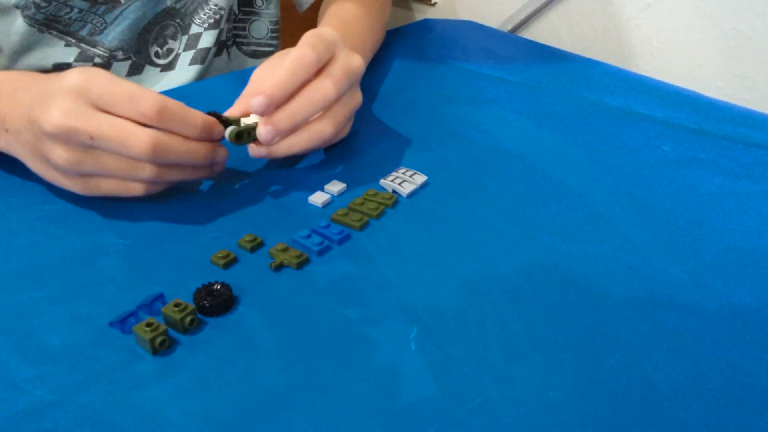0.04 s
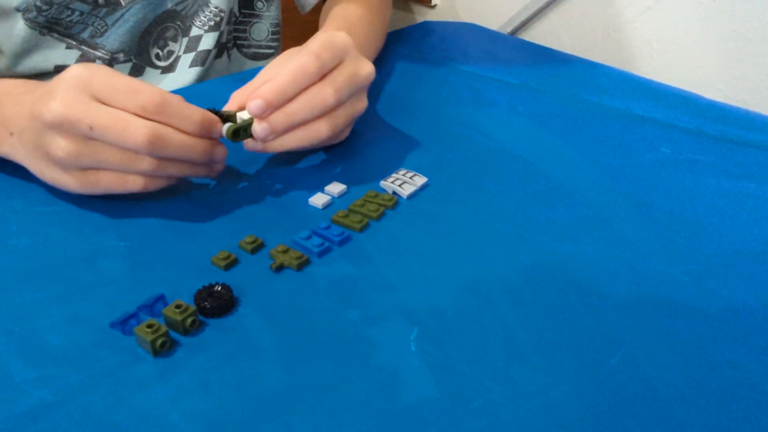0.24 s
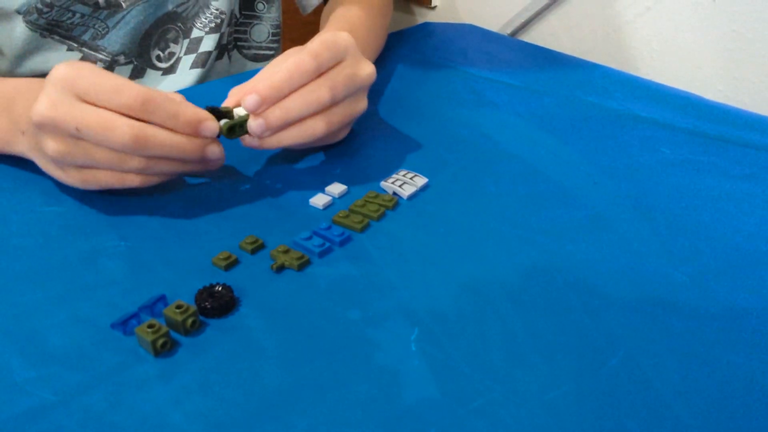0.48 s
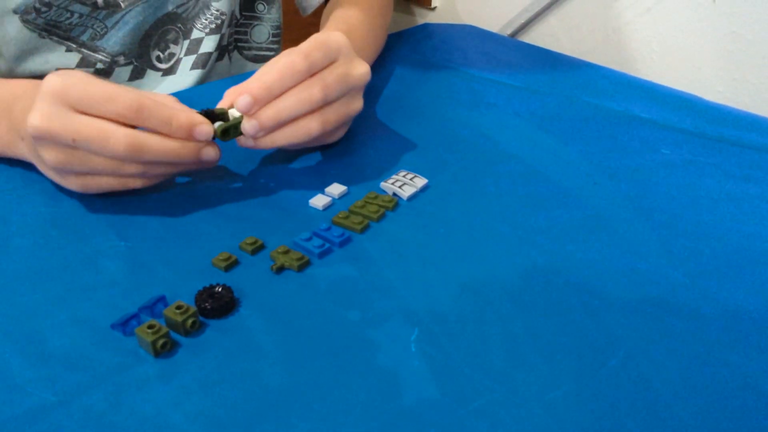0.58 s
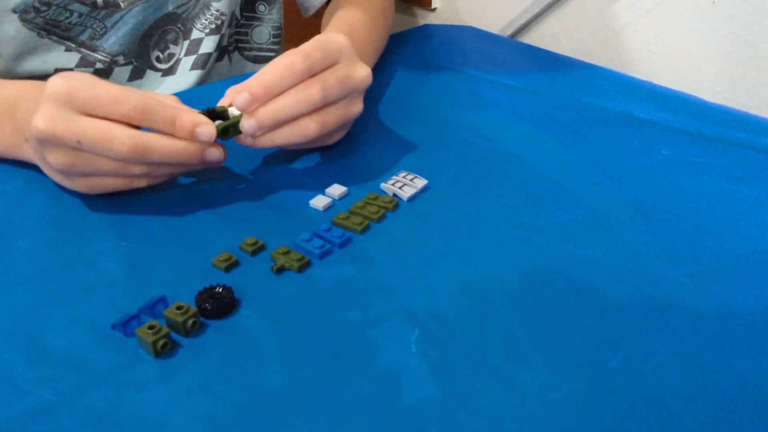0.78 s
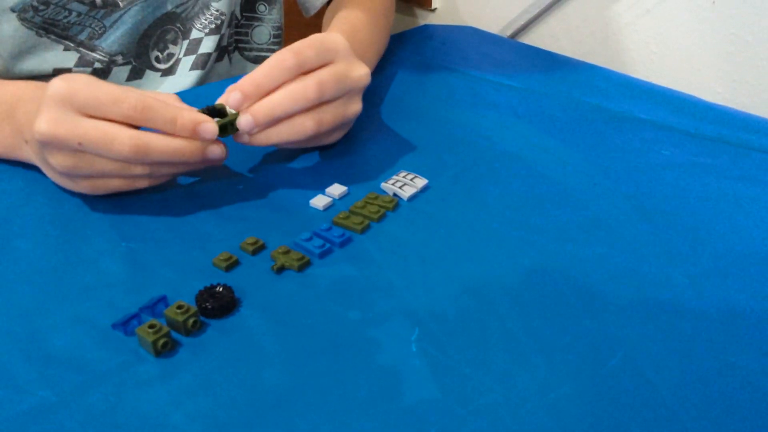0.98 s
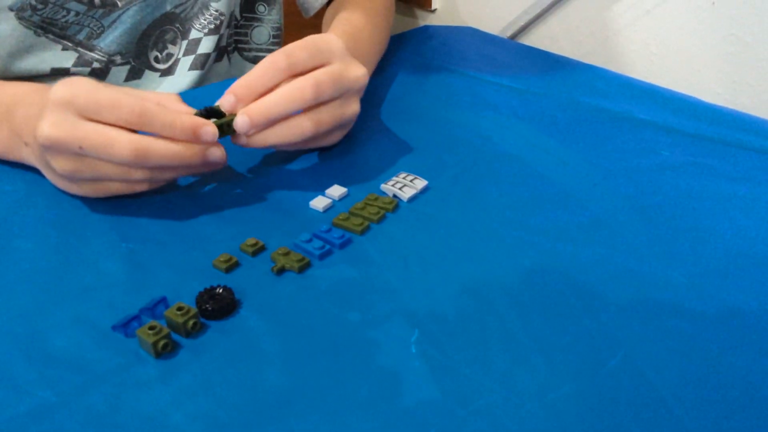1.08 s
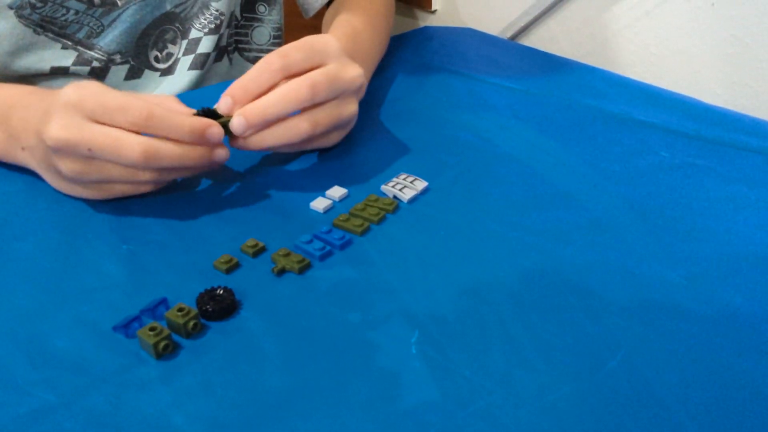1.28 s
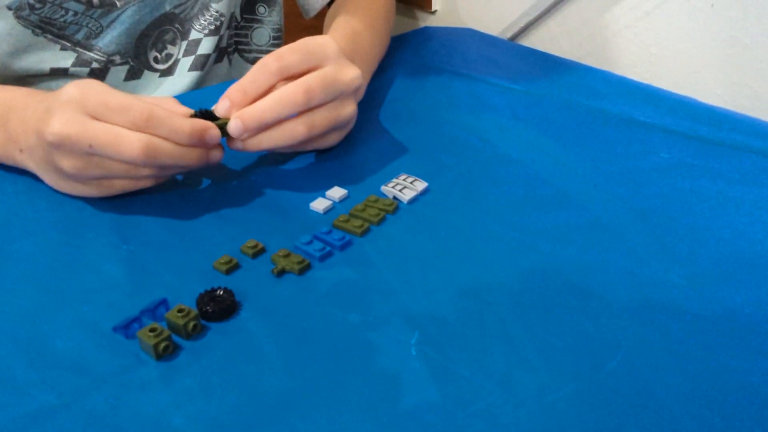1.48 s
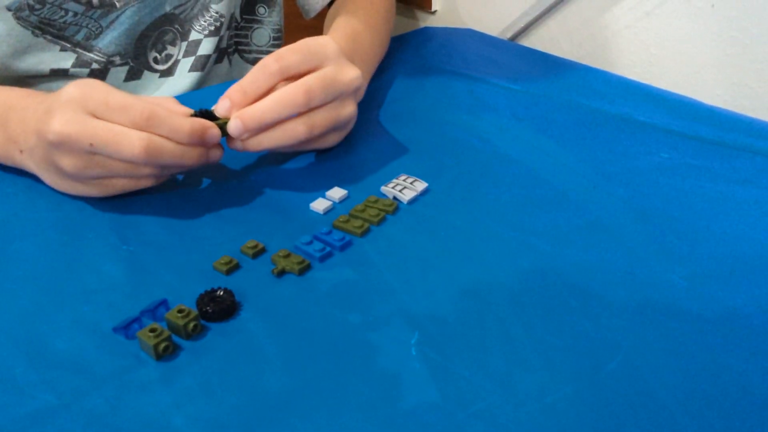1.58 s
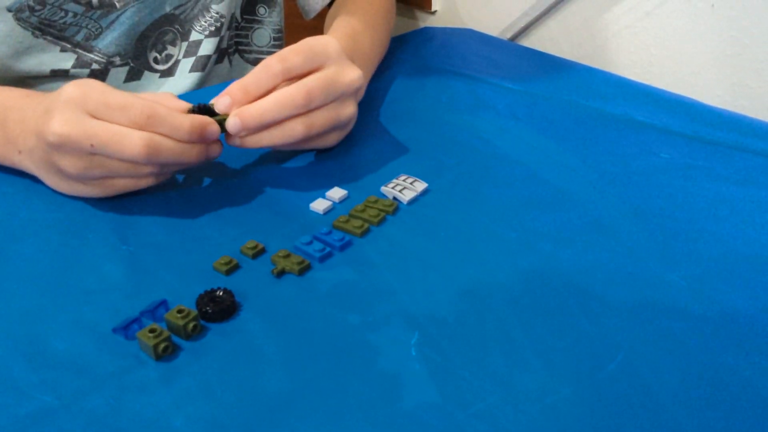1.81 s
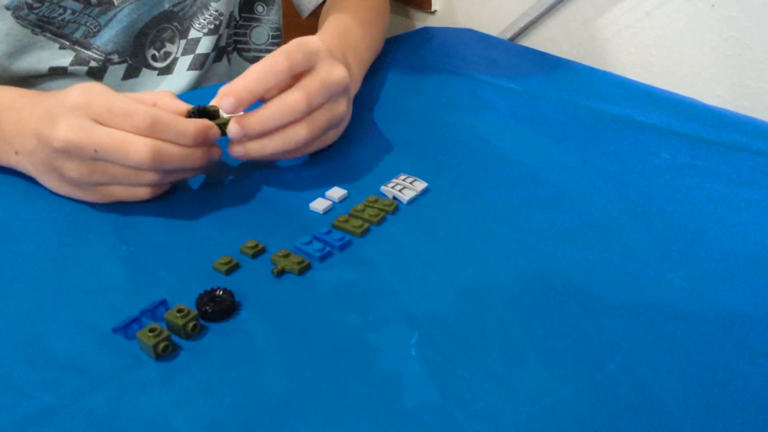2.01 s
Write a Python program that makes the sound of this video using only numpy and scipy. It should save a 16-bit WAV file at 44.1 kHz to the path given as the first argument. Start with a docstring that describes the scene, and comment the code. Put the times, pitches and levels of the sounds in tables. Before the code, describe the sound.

Small plastic bricks snap once sharply up close, after wooden knocking and rattling further off indoors

```python
"""Fingers press small plastic bricks together near a phone: one clear snap and a few faint ticks.
Each contact is a quick run of strikes, made of short ringing tones that die away.
Further off, something wooden with a metal fitting is knocked and rattled: more ringing tones, and
the room smears every blow with a tail of fading noise.
A low hum (a wavering sine) and a dull indoor rumble (shaped noise) lie under it all."""
import sys
import numpy as np
from scipy import signal
from scipy.fft import rfft, irfft
from scipy.io import wavfile
from scipy.ndimage import uniform_filter1d

SR = 44100
rng = np.random.default_rng(int(sys.argv[2]) if len(sys.argv) > 2 else 0)


def invert_db(level):
    """Linear amplitude ratio for a level in decibels (20 dB per decade), elementwise."""
    return 10 ** (np.asarray(level, dtype=float) / 20)


def generate_wav(sig):
    """Save sig (samples, or channels by samples) to the path in sys.argv[1] as 16-bit PCM at SR."""
    pcm = np.round(np.clip(np.atleast_2d(sig).T, -1, 1) * 32767).astype(np.int16)
    wavfile.write(sys.argv[1], SR, pcm)


N = 90404

# Each part of the far thing radiates only in its own range; rows: boom, thud, clack, edge, fitting
# (lowest frequency [Hz], highest frequency [Hz])
PART_RANGES = [(190, 480), (90, 1000), (800, 3300), (2900, 16500), (8000, 16500)]
STRIKE_SCATTER_DB = 2  # how much each tone's level varies from strike to strike


def on_log(hz, table):
    """Read (frequency [Hz], value) points on a log-frequency axis."""
    f, v = np.array(table, float).T
    return np.interp(np.log(hz + 1), np.log(f + 1), v)


def level(x, db):
    """Set the rms level in dB."""
    return x * invert_db(db) / np.sqrt(np.mean(x ** 2))


def walk(rate):
    """Slow random drift: random values held for 1 / rate seconds, then smoothed twice."""
    k = int(SR / rate)
    held = np.repeat(rng.standard_normal(N // k + 1), k)
    return uniform_filter1d(uniform_filter1d(held, k), k)[:N]


def add(track, s, sound):
    """Mix a sound in at time s."""
    i = int(s * SR)
    track[..., i:i + sound.shape[-1]] += sound[..., :track.shape[-1] - i]


def wide_noise(size):
    """Spectrum of left and right noise: how alike the two sides are depends on frequency."""
    # Likeness of left and right, 1 = nearly the same: (frequency [Hz], likeness [0 to 1])
    likeness = [(60, 1), (130, 1), (290, 0.77), (640, 0.66), (1400, 0), (16000, 0.45)]
    alike = np.clip(on_log(np.fft.rfftfreq(size, 1 / SR), likeness), -.99, .99)
    mid, side = rfft(rng.standard_normal((2, size)))
    mid = mid * np.sqrt((1 + alike) / 2)
    side = side * np.sqrt((1 - alike) / 2)
    return np.array([mid + side, mid - side])


def rumble():
    """Dull indoor noise: random air pressure, strongest in the bass, whose level flickers."""
    # Colour of the noise: (frequency [Hz], relative level [dB])
    colour = [(20, -36), (45, -11), (80, 7.5), (115, -8), (170, -8), (256, -16.5), (356, -14.5),
              (468, -11.5), (725, -20), (3000, -30.5), (9000, -44.5), (14000, -56)]
    flicker_db, rumble_db = 1.5, -55
    shape = invert_db(on_log(np.fft.rfftfreq(N, 1 / SR), colour))
    air = irfft(wide_noise(N) * shape, N)
    return level(air * invert_db(flicker_db * walk(10)), rumble_db)


def hum():
    """A low tone whose pitch and loudness both waver slowly."""
    centre_hz, waver_hz, hum_db = 81, 1.6, -64
    pitch_hz = centre_hz + waver_hz * walk(12)
    tone = np.sin(2 * np.pi * np.cumsum(pitch_hz) / SR)
    return level(tone * invert_db(3.0 * walk(14)), hum_db)


def ring(modes, scatter_db):
    """One strike: decaying tones, neighbours in opposite phase, each a little different every time."""
    t = np.arange(4096)[:, None] / SR
    hz, db, t60 = np.array(modes, float).T
    pitch_chance, level_chance = rng.standard_normal((len(hz), 2)).T
    tone = np.sin(2 * np.pi * hz * (1 + pitch_chance / 50) * t)
    tone = tone * (-1.) ** np.arange(len(hz))
    decay = np.exp(-np.log(1000) * t / t60)  # falls by 60 dB in t60 seconds
    return (invert_db(db + scatter_db * level_chance) * tone * decay).sum(axis=1)


def blow(modes, hz, db):
    """A strike heard in its own frequency range; db is its energy spread over 2.5 ms."""
    band = signal.butter(3, hz, "bandpass", fs=SR, output="sos")
    x = signal.sosfilt(band, ring(modes, STRIKE_SCATTER_DB))
    return x * invert_db(db) * np.sqrt(SR / 400 / np.sum(x ** 2))


def knocks():
    """Blows ring the wooden thing's boom, thud, clack and edge tones; soft bumps leave out the edge."""
    # Blows, before the room:
    # (time [s], boom level [dB], thud level [dB], clack level [dB], edge level [dB])
    knock_times = [(0.203, -37, -10, -11.5, -35.5), (0.216, -26, -5.5, -10.5, -44),
                   (0.233, -27, -17.5, -30.5, -36.5), (0.245, -14, -17.5, -35.5, -50.5),
                   (0.259, -27, -17, -14, -40.5), (0.511, -11, -11, -7.5, -25),
                   (0.525, -10.5, -26.5, -10, -23), (0.549, -18.5, -25.5, -11, -25),
                   (0.597, -32, -36, -18.5, -30.5), (0.675, -8.5, -13.5, -13.5, -61.5),
                   (0.703, -20, -32, -44, -40.5), (0.758, -20.5, -21.5, -12.5, -34),
                   (0.772, -17, -26, -24.5, -45.5), (0.796, -55, -28.5, -26.5, -43),
                   (0.831, -28.5, -34.5, -25, -51), (0.844, -25, -25, -19.5, -44),
                   (0.867, -22.5, -27.5, -27, -56), (0.891, -25.5, -26.5, -26.5, -56.5),
                   (0.934, -26.5, -32, -48, -76), (0.96, -34, -45.5, -55, -72), (1.007, -53, -59, -66, -82)]
    # Soft far bumps, before the room:
    # (time [s], boom level [dB], thud level [dB], clack level [dB])
    bump_times = [(1.27, -65, -48, -70), (1.351, -54, -46.5, -67.5), (1.468, -44.5, -45.5, -59),
                  (1.49, -31.5, -35, -46.5), (1.52, -32, -59, -55.5), (1.556, -38, -43.5, -66),
                  (1.6, -43.5, -47.5, -80), (1.85, -47, -57, -74), (1.97, -48, -52, -78)]
    # Tones of each part:
    # (typical frequency [Hz], relative level [dB], time to fall by 60 dB [s])
    boom = [(230, -10, 0.04), (273, -1.5, .04), (363, -0.5, .045), (453.6, -2, .04)]
    thud = [(129, -7, 0.039), (190, -10, 0.049), (468, -1, .035), (553.2, -2.5, 0.056), (607, 2.5, .02),
            (810, 3, 0.0058)]
    clack = [(1100, -1.5, 0.0085), (1413, -0.5, 0.011), (1585, 0, 0.011), (1920, -1, 0.011),
             (2194, 3.5, 0.0042), (2740, -1, 0.0037), (3200, -13.5, 0.0017)]  # levels before the tilt below
    edge = [(3480, -14.5, .003), (4237, 31, 0.0018), (5000, -23, 0.0017), (6580, 7, 0.0014),
            (8900, -15.5, 0.00067), (10130, -13.5, 0.0025), (12300, -12.5, .002), (15000, -20.5, .002)]
    # A blow with more edge is harder, so its clack tilts brighter:
    # dB per octave for each dB of edge over clack, counted from the even point
    hardness_tilt, even_edge_db = .3, -25
    out = np.zeros(N)
    for s, *parts in knock_times + bump_times:
        tilt = -4  # dB per octave, for bumps
        if len(parts) > 3:
            edge_over_clack = parts[3] - parts[2]
            tilt = np.clip(hardness_tilt * (edge_over_clack - even_edge_db), -9, 2)
        tilted_clack = [(f, g + tilt * np.log2(f / 1600), d) for f, g, d in clack]
        # a bump lists no edge level, so the loop stops after its clack
        for modes, hz, db in zip((boom, thud, tilted_clack, edge), PART_RANGES, parts):
            add(out, s, blow(modes, hz, db))
    return out


def snaps():
    """Hard plastic contacts in quick steps; the right port hears them a little later."""
    # Snaps and ticks: (time [s], level [dB], left over right [dB], tilt to treble [dB per octave])
    contacts = [(0.4175, -47, -14, 0.5), (1.1546, -67, -13, 13), (1.445, -19.5, -7.5, 3.5),
                (1.6886, -54, -4, 1)]
    # A brick assembly ringing, before the tilt:
    # (typical frequency [Hz], relative level [dB], time to fall by 60 dB [s])
    brick = [(1822, -4, 0.0069), (2107, -0.5, 0.01), (2800, -7.5, .005), (3550, -11.5, .004),
             (4000, -3, .004), (4640, -4, 0.0019), (5250, -14, .003), (6200, -17, .002), (7300, -20, .002),
             (8470, -20, .002), (10200, -23, .002), (12500, -29, .002), (14980, -25.5, .003)]
    # Studs seat in steps, then the table and wall answer:
    # (time after first contact [s], level [dB])
    seating = [(0, -2), (.0009, -2), (.0022, -2), (0.0111, -17.5), (0.02, -19.5)]
    right_lag_s = 0.00077
    out = np.zeros((2, N))
    for s, db, lean_db, tilt in contacts:
        modes = [(f, g + tilt * np.log2(f / 2256), d) for f, g, d in brick]
        for after, step_db in seating:
            for ch, sign in enumerate((1, -1)):
                strike = ring(modes, STRIKE_SCATTER_DB) * invert_db(db + step_db + sign * lean_db / 2)
                add(out[ch], s + after + ch * right_lag_s, strike)
    return out


def jingles():
    """The metal fitting jingles along with some of the knocks: short, very high ringing tones."""
    # Jingles, before the room: (time [s], level [dB])
    jingle_times = [(0.527, -38), (0.76, -44), (0.771, -41), (.845, -53)]
    # Tones of the fitting: (typical frequency [Hz], relative level [dB], time to fall by 60 dB [s])
    fitting = [(9550, 0.5, 0.016), (11120, -7.5, .005), (14200, -4, 0.004), (15400, -14, .004)]
    out = np.zeros(N)
    for s, db in jingle_times:
        add(out, s, blow(fitting, PART_RANGES[-1], db))
    return out


def room():
    """Stereo response: uneven echoes fill in, each octave dies at its own rate; mean energy 1."""
    # How long the room rings: (frequency [Hz], time to fall by 60 dB [s])
    ring_times = [(60, 0.35), (200, 0.25), (560, 0.32), (1500, 0.33), (4000, 0.33), (10000, 0.32),
                  (16000, 0.073)]
    fill_s, echo_scatter_db, scatter_fade_s = 0.001, 3.5, 0.052
    size = 32768
    t, hz = np.arange(size) / SR, np.fft.rfftfreq(size, 1 / SR)
    noise, out = wide_noise(size), 0
    for centre in 60 * 2. ** np.arange(9):
        share = np.clip(1 - abs(np.log2((hz + 1) / centre)), 0, 1)  # overlaps its neighbours
        decay = np.exp(-np.log(1000) * t / on_log(centre, ring_times))
        out = out + irfft(noise * share, size) * decay
    echoes = np.repeat(rng.standard_normal(size // 64), 64)
    unevenness = invert_db(echo_scatter_db * echoes * np.exp(-t / scatter_fade_s))
    out = out * (1 - np.exp(-t / fill_s)) * unevenness
    return out / np.sqrt(np.sum(out ** 2) / 2)


def scene():
    """Far blows come through the room and a duller straight path; bricks are near and nearly dry."""
    # Balance of the far sounds: (frequency [Hz], left over right [dB])
    far_lean = [(60, 1), (130, 1.5), (250, -0.5), (500, -4.5), (1000, -3.5), (2000, -9.5), (4000, -9),
                (8000, -9.5), (14000, 3)]
    direct_top_hz, direct_db = 4500, -6
    snap_room_db, background_lean_db = -16.5, -1.5  # lean: left over right
    walls, blows, near = room(), knocks() + jingles(), snaps()
    # the straight path bends round furniture and loses its treble
    dull = signal.butter(2, direct_top_hz, fs=SR, output="sos")
    straight = invert_db(direct_db) * signal.sosfilt(dull, blows) * np.array([[.8], [1]])
    far = signal.fftconvolve(blows[None], walls, axes=1)[:, :N] + straight
    lean = on_log(np.fft.rfftfreq(N, 1 / SR), far_lean)
    far = irfft(rfft(far) * invert_db(np.array([lean, -lean]) / 2), N)
    near = near + invert_db(snap_room_db) * signal.fftconvolve(near, walls, axes=1)[:, :N]
    background = (rumble() + hum()) * invert_db(np.array([[.5], [-.5]]) * background_lean_db)
    return far + near + background


def suppress(x):
    """Noise suppressor: turns down each band above the bass when it nears its own quietest level."""
    most_cut_db, margin_db, from_hz = -11, 1, 320
    hz, _, z = signal.stft(x, SR, nperseg=512)
    power = (abs(z) ** 2).mean(axis=0)
    power = uniform_filter1d(uniform_filter1d(power, 21, axis=0), 3, axis=1)
    quiet = np.percentile(power, 25, axis=1, keepdims=True) * invert_db(2 * margin_db)
    passed = power ** 3 / (power ** 3 + quiet ** 3)  # near 1 = well above the quiet level
    above_bass = np.clip(hz[:, None] / from_hz - 1, 0, 1)  # full effect an octave above from_hz
    gain = invert_db(most_cut_db * (1 - passed) * above_bass)
    return signal.istft(z * gain, nperseg=512)[1][:, :N]


def band_limit(x):
    """A steep low-pass at the top of the band."""
    return signal.sosfilt(signal.butter(12, 16820, fs=SR, output="sos"), x)


def record(dry):
    """The phone drops deep bass, adds faint hiss, suppresses steady noise and rounds peaks."""
    hiss_db, limit = -93.5, 1.1  # hiss before the suppressor; ceiling of the rounding
    mic = signal.sosfilt(signal.butter(2, 35, "highpass", fs=SR, output="sos"), dry)
    mic = suppress(mic + invert_db(hiss_db) * rng.standard_normal(dry.shape))
    mix = np.tanh(mic / limit) * limit
    return band_limit(mix)


dry = scene()
out = record(dry)
generate_wav(out)
```